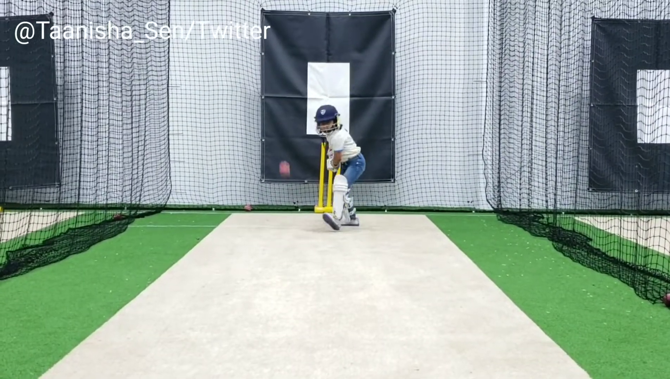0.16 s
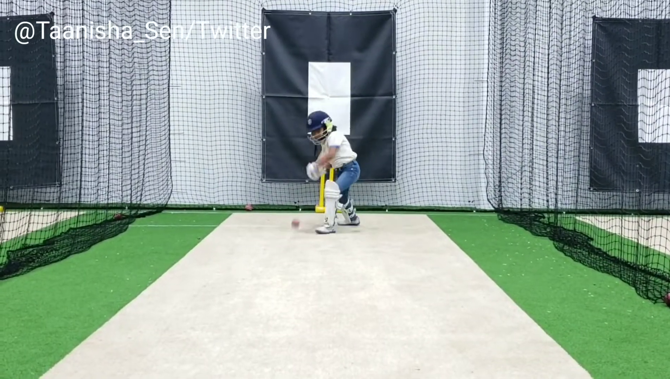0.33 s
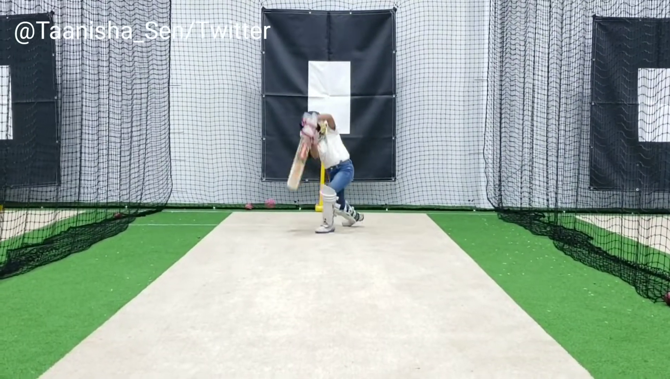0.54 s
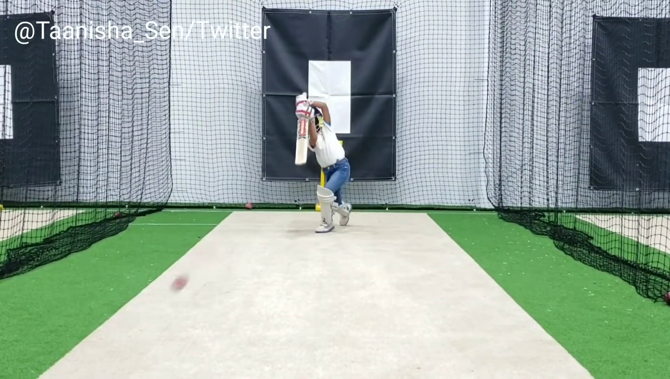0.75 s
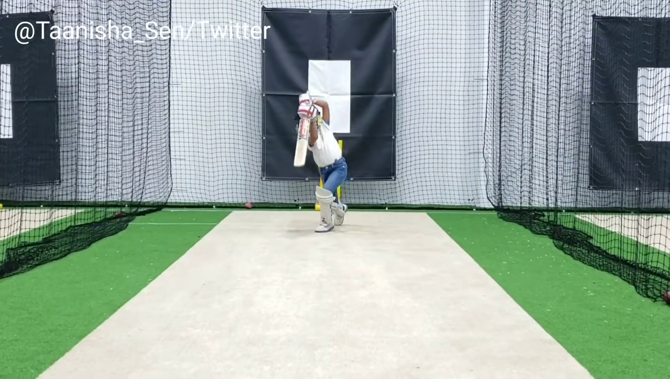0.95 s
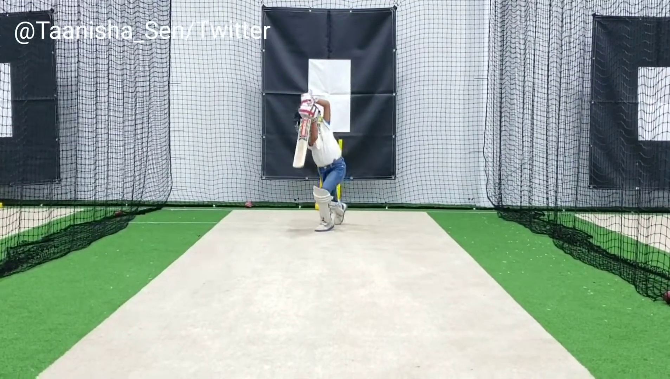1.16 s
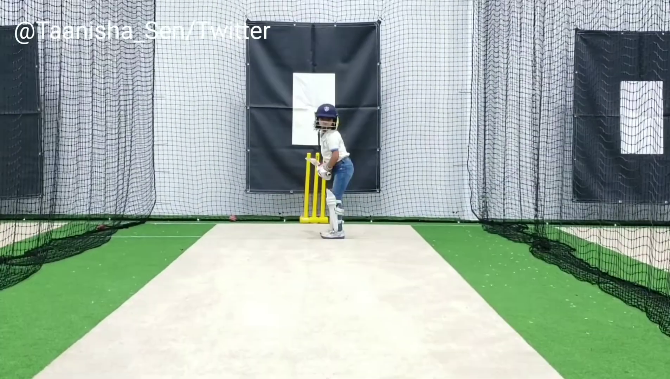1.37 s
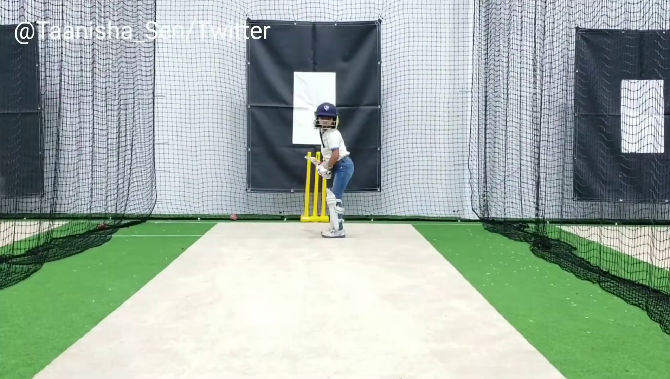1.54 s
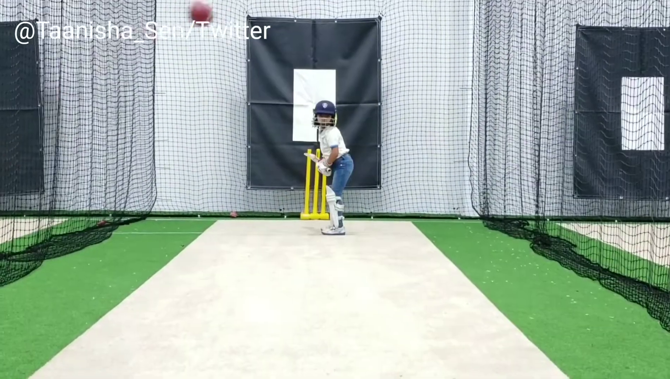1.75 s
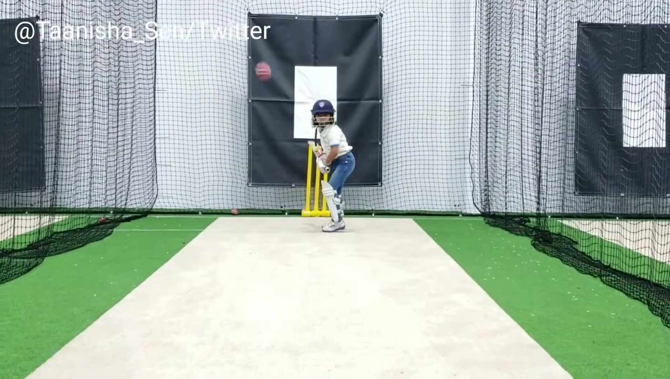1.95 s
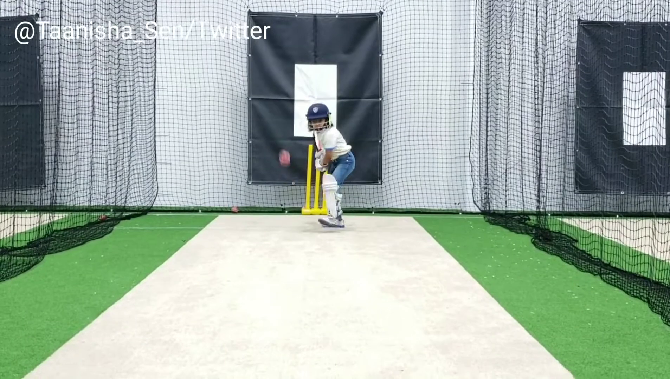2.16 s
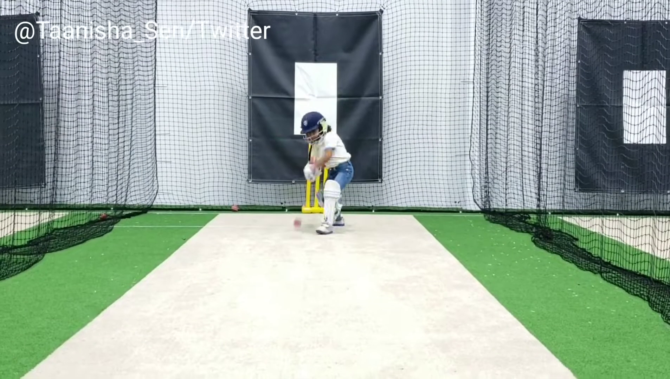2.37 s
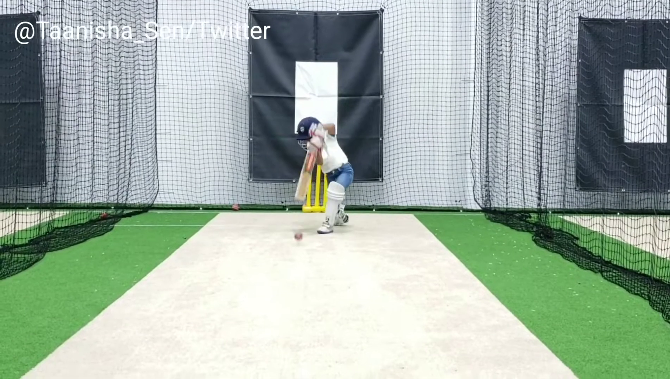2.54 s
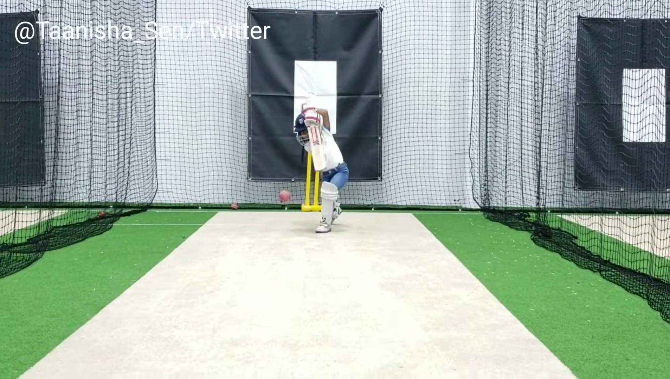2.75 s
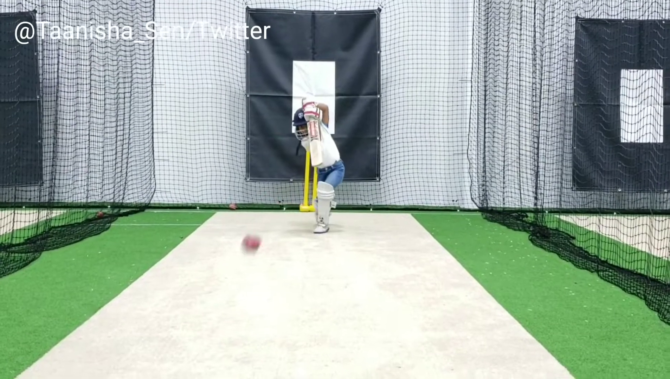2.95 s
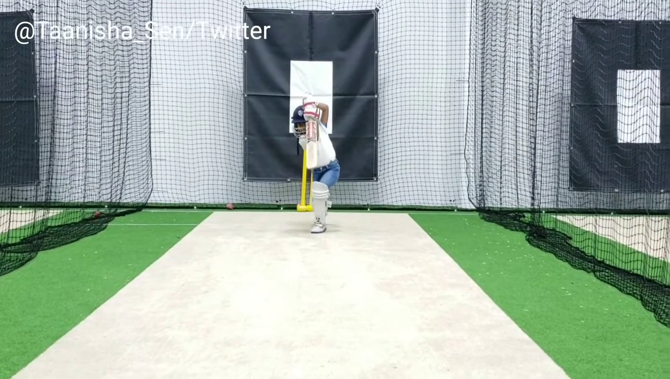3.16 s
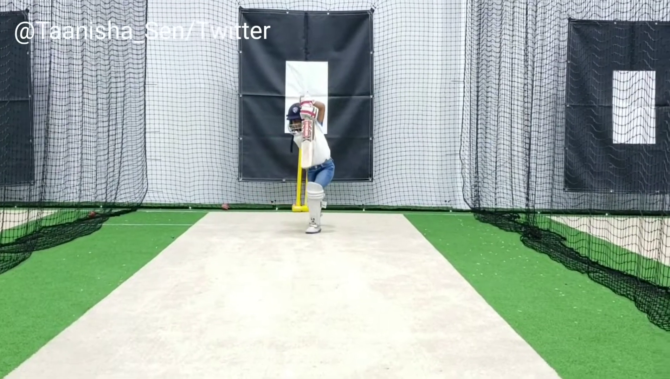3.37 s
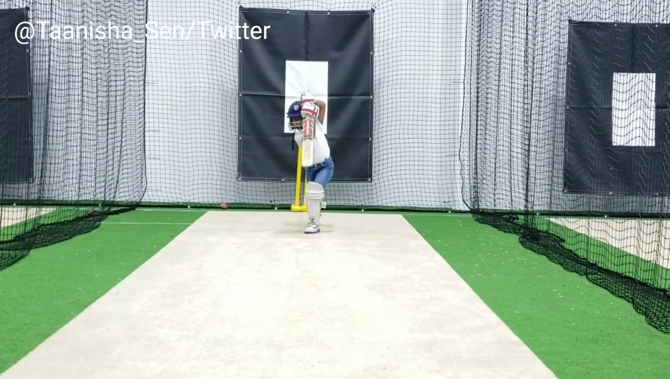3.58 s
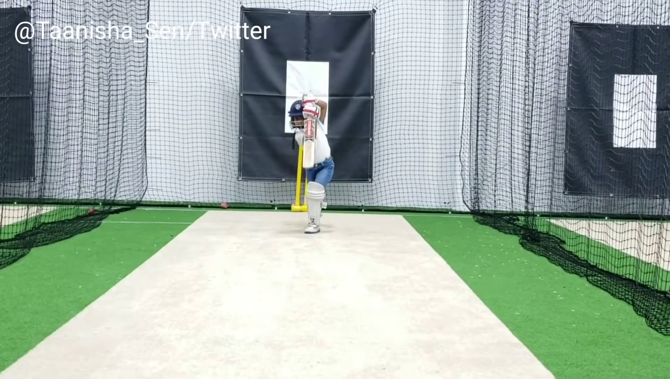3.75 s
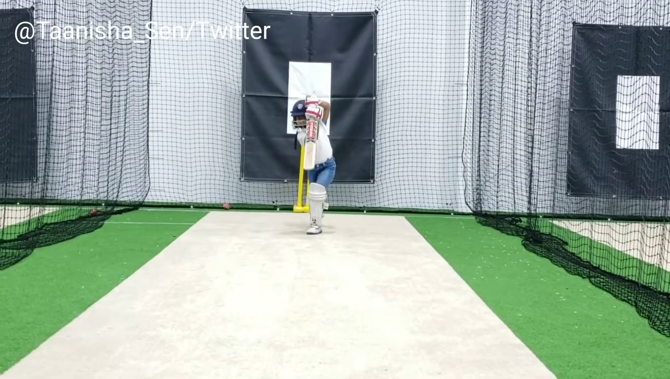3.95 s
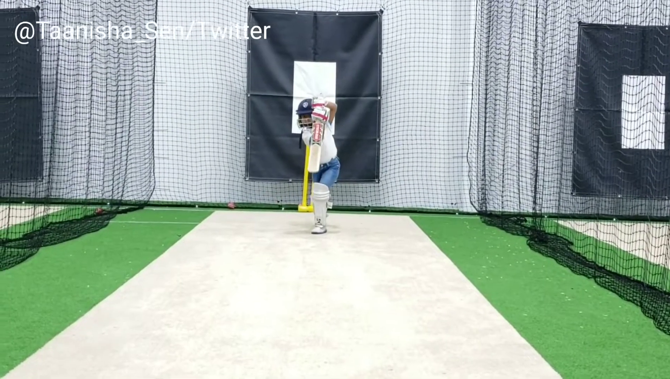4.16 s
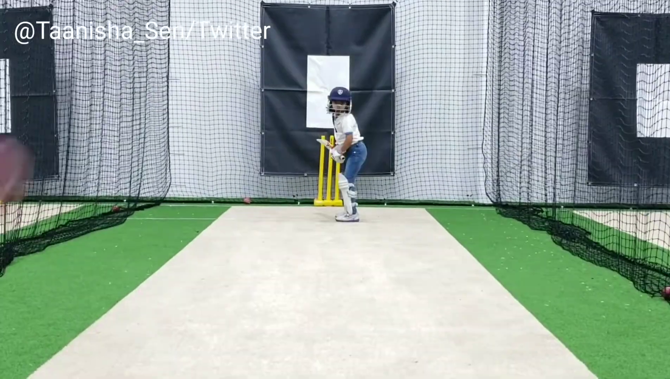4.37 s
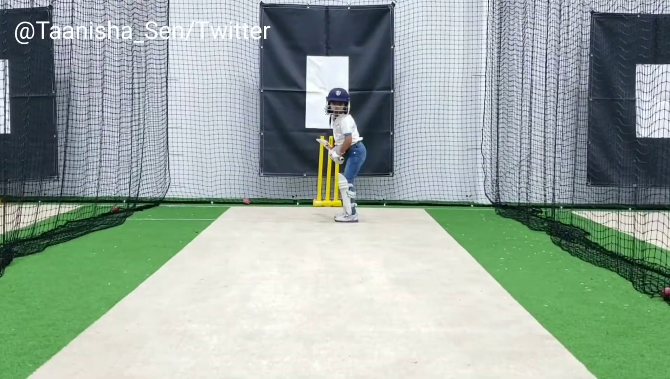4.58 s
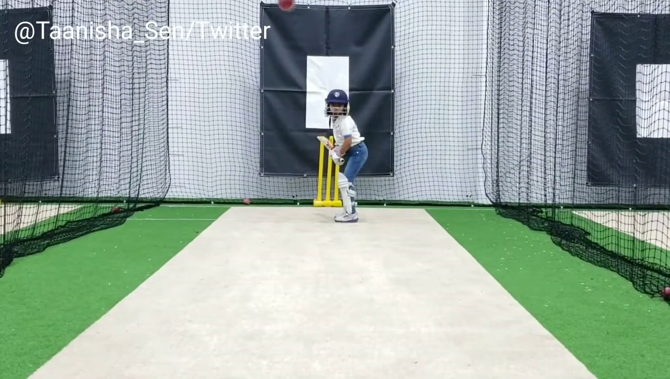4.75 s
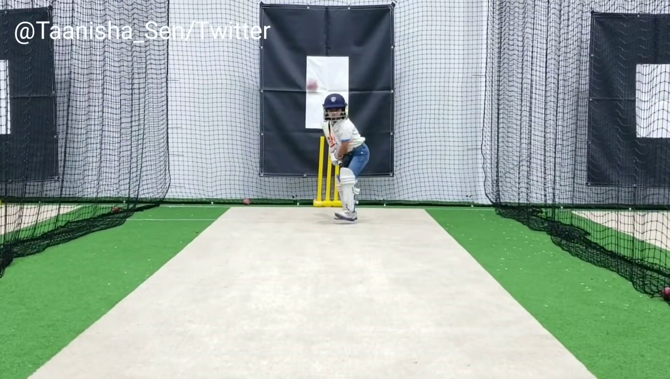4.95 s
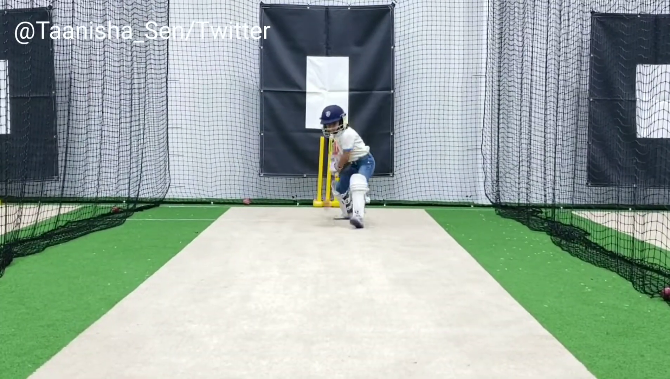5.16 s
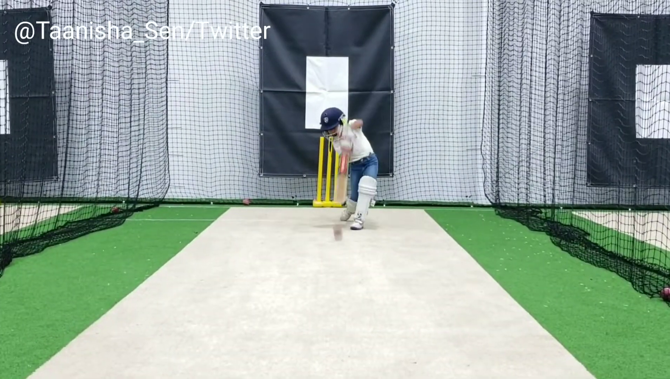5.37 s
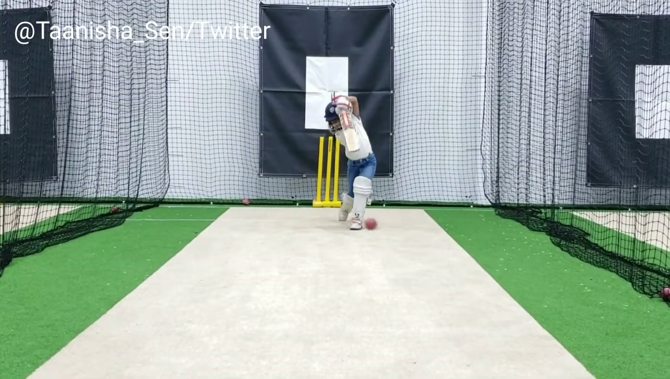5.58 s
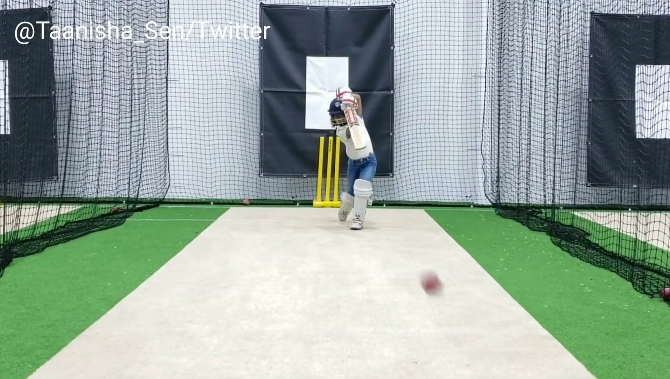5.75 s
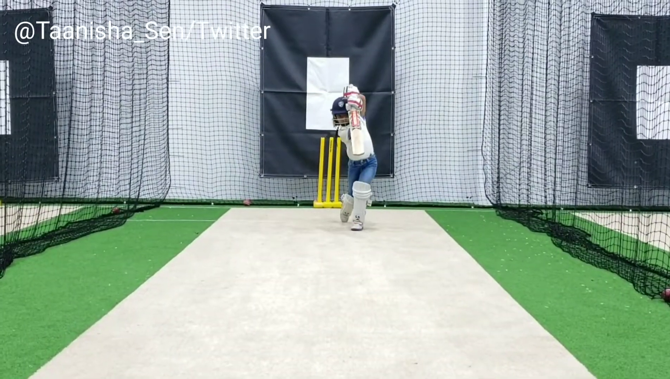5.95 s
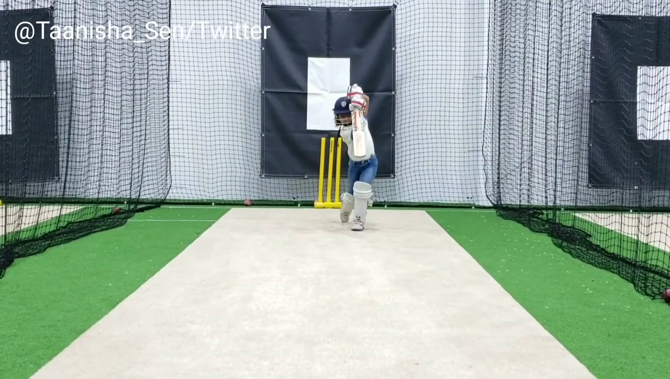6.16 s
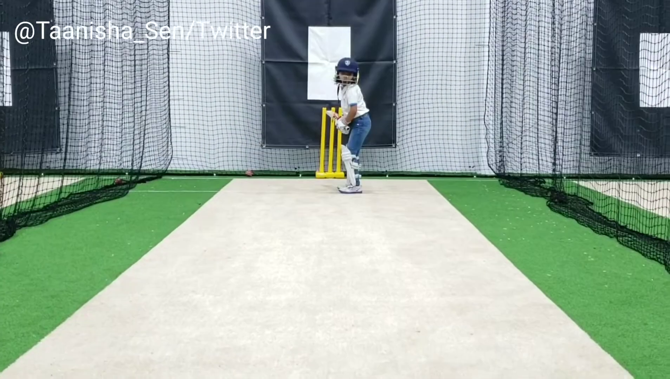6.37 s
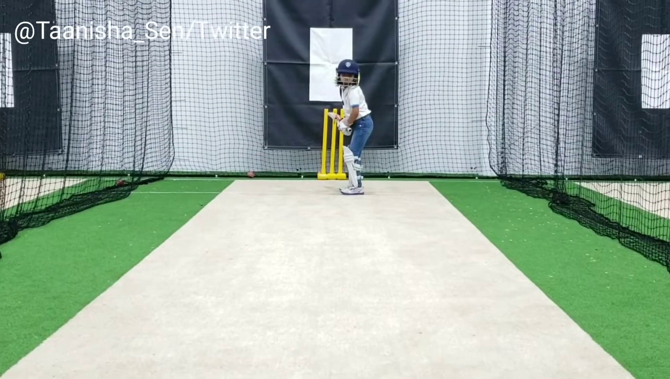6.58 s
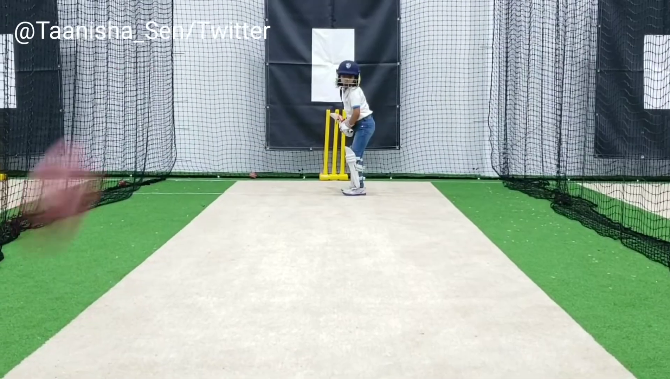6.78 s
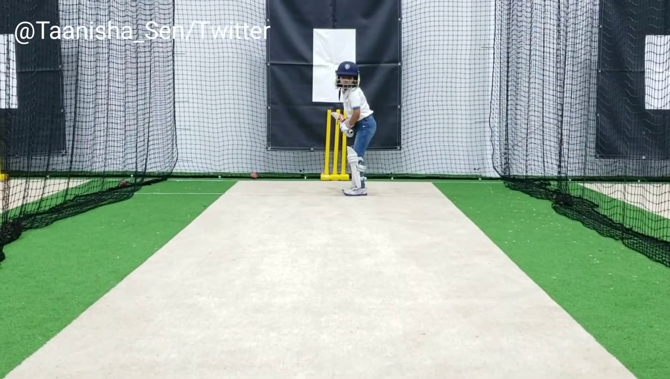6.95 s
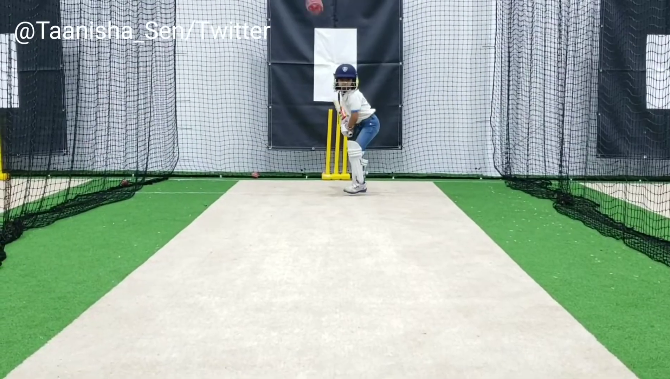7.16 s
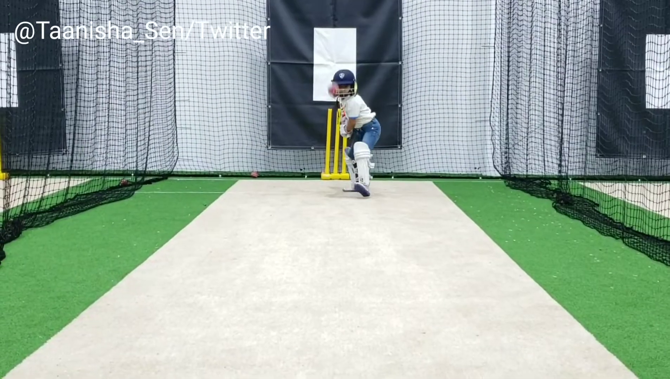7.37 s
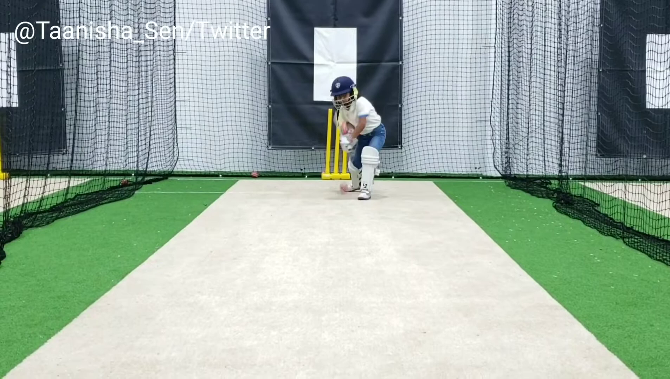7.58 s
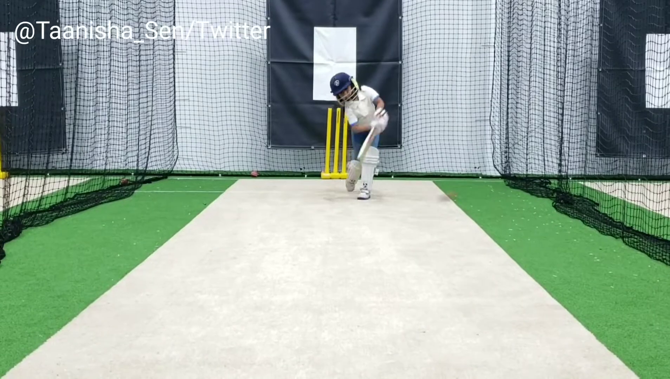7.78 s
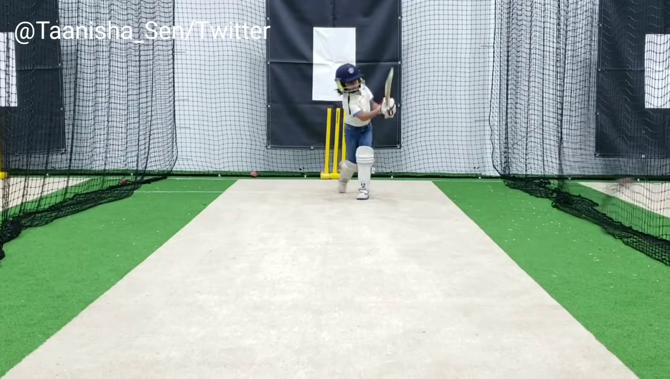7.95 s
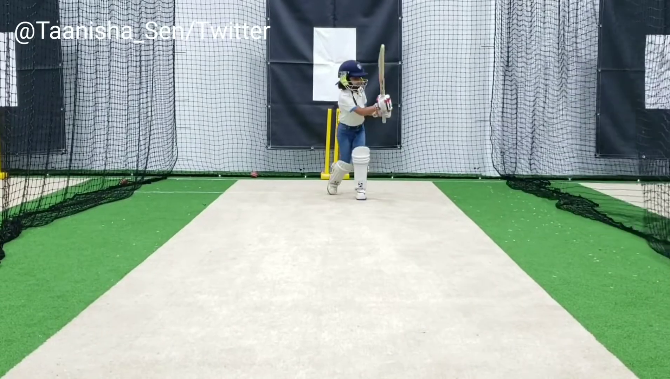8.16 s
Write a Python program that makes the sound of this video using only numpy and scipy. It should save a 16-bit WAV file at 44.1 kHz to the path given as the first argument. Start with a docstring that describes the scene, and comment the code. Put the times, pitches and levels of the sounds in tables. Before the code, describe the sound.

A quiet indoor cricket net hall, heard on a phone at the bowler's end, slightly louder on the left. Low rumble, faint hum and hiss open the scene. At 0.53 s a ball pitches with a dull thud; at 0.65 s a bat cracks it, very loud, short and woody, slapping off the back wall into a hall tail under a second. Small ticks and cloth rustle follow from 1.0 to 2.2 s. Another thud at 2.55 and a brighter crack at 2.67. Close knocks at 3.4 and 3.6, soft rustling, and a grainy scuff around 4.25-4.45. Thud at 5.4, darker crack at 5.49, then small bumps near 5.85-6.1 and 6.47 and cloth swishes until 7.2. A faint thud at 7.79 and a final, fuller, less bright knock at 7.86, ending with a light net rustle at 8.08. The background sinks after strokes and returns, except after the last.

```python
"""A willow bat cracks four times in an indoor net hall: damped wooden modes and a burst of noise,
slapped back by the wall behind the batter and followed by a diffuse hall tail of shaped noise.
Just before each stroke the ball pitches on the mat with a dull, damped thud.
Near the microphone are small knocks, clothes rustling as shaped noise and one grainy scuff; last, the net.
Background rumble and hiss of noise and a two-sine hum sink after each stroke and come back, bar the last."""
import sys
import numpy as np
from scipy import signal
from scipy.fft import rfft, irfft, next_fast_len
from scipy.io import wavfile
from scipy.ndimage import map_coordinates

SR = 44100
rng = np.random.default_rng(int(sys.argv[2]) if len(sys.argv) > 2 else 0)


def wav_out(sig):
    """Save sig, one row per channel (or a flat mono array), as 16-bit PCM at SR to the path in sys.argv[1]."""
    wavfile.write(sys.argv[1], SR, np.round(np.clip(np.atleast_2d(sig).T, -1, 1) * 32767).astype(np.int16))


N = 362502

# Noise of a hard contact. Each row: frequency in Hz, relative density in dB.
CONTACT_COLOUR = [(1500, -17.5), (3000, -6.5), (4000, -4.5), (5000, -9), (7000, -1.5), (10500, 2.5),
                  (12500, -9.5)]
# The blow as it spreads through the hall. Each row: frequency in Hz, relative density in dB per Hz.
HALL_COLOUR = [(50, -35.5), (100, -10), (160, -1.5), (250, 1.5), (320, 1), (450, -1), (700, -0.5),
               (1150, 2), (1600, -6.5), (2400, -11.5), (4000, -15), (7000, -15.5), (10500, -16),
               (13000, -38.5)]


def amp(db):
    """Decibels to gain."""
    return 10 ** (np.asarray(db) / 20)


def unit(x):
    """Scale to rms 1."""
    return x / np.sqrt(np.mean(x ** 2) + 1e-20)


def along(points, hz):
    """Read (Hz, value) points on a log frequency axis."""
    f, v = np.transpose(points)
    return np.interp(np.log(hz + 1), np.log(f + 1), v)


def bell(hz, centre, width):
    """A resonance curve, 1 at its centre and one half at the edges of its width."""
    return 1 / (1 + (2 * (hz - centre) / width) ** 2)


def pan(db):
    """Left and right gains, db apart."""
    return amp([[db / 2], [-db / 2]])


def wobble(rate, size=N):
    """A smooth random curve, rate knots a second."""
    knots = rng.standard_normal(int(size * rate / SR) + 4)
    return map_coordinates(knots, [np.arange(size) * rate / SR])


def fade(t60):
    """One second of exponential decay, falling 60 dB in t60 seconds."""
    return np.exp(-np.log(1000) * np.arange(SR) / SR / t60)


def envelope(start, end, attack_s, release_s, easing_db=0):
    """A straight attack, a hold that eases off by easing_db a second, and an exponential release."""
    t = np.arange(N) / SR
    attack = np.clip((t - start) / attack_s, 0, 1)
    held = amp(-easing_db * (np.clip(t, start, end) - start))
    return attack * held * np.exp(-np.maximum(t - end, 0) / release_s)


def filtered(x, response):
    """Filter x by a gain given as a function of frequency."""
    n = x.shape[-1]
    m = next_fast_len(n + SR // 4)
    return irfft(rfft(x, m) * response(np.fft.rfftfreq(m, 1 / SR)), m)[..., :n]


def noise(colour, size=N):
    """Diffuse stereo noise of rms 1: alike in the bass, unrelated in the treble."""
    # Each row: frequency in Hz, left-right correlation.
    alike = [(130, .94), (270, 0.82), (590, 0.64), (1250, 0), (2700, 0), (6000, 0)]

    def mid_side_gain(hz):
        turn = np.arccos(np.clip(along(alike, hz), -1, 1)) / 2
        return amp(along(colour, hz)) * [np.cos(turn), np.sin(turn)]

    mid, side = filtered(rng.standard_normal((2, size)), mid_side_gain)
    return unit(np.array([mid + side, mid - side]))


def add(track, s, sound):
    """Mix a sound into the track at time s."""
    start = max(round(s * SR), 0)
    part = track[:, start:start + sound.shape[-1]]
    part += sound[..., :part.shape[-1]]


def ring(modes, contact_s=.0005, upper_db=0, radiate_hz=100):
    """A struck body's damped modes build up during the contact; so small a body radiates no deep bass."""
    t = np.arange(SR) / SR
    swing = np.zeros(SR)
    for hz, db, t60 in modes:
        level = amp(db + upper_db * (hz > 1250))
        swing -= level * fade(t60) * np.sin(2 * np.pi * hz * t)
    high_pass = signal.butter(2, radiate_hz, "high", fs=SR, output="sos")
    return signal.sosfilt(high_pass, swing * (1 - np.exp(-t / contact_s)))


def hall(treble_db=0, presence_db=0, body_db=0, gap=0.0099, build_s=0.0034,
         early_db=6, early_t60=0.14, clump_db=1.5):
    """The hall's answer to one blow: dense early reflections, then a tail whose bands decay apart."""
    # Tail decay. Each row: frequency in Hz, t60 in seconds.
    decay = [(100, 0.96), (250, 1), (600, 0.89), (1100, 0.66), (1800, 0.93), (2600, 0.73), (5000, 0.88),
             (7000, 0.76), (9000, 0.52), (12000, 0.5)]
    # Pitches that stand out in the hall. Each row: frequency in Hz, width in Hz, lift in dB.
    peaks = [(148, 52, 1.5), (210, 26, 6), (284, 14, 3.5), (354, 36, 3.5), (666, 45, 4.5), (1030, 24, 7.5),
             (1377.6, 100, 3), (1940, 21, -2.5), (2350, 25, 0), (4820, 240, 2.5)]
    comb_s, comb_db = .0141, 1
    t = np.arange(SR) / SR

    def room_gain(f):
        peaks_db = sum(db * bell(f, centre, width) for centre, width, db in peaks)
        # a blow and its slap off the wall colour the hall like a comb
        return amp(peaks_db + comb_db * np.cos(2 * np.pi * f * comb_s))

    diffuse = filtered(noise(HALL_COLOUR, size=SR), room_gain)
    hz, s, z = signal.stft(unit(diffuse), SR, nperseg=512)
    decay_db = -60 * s / along(decay, hz)[:, None]
    # each blow lands on another spot and has its own uneven treble
    colour_db = 3 * rng.standard_normal(len(hz)) * hz / (hz + 1500)
    colour_db += body_db * bell(hz, 950, 600) + presence_db * bell(hz, 2700, 2200)
    colour_db += treble_db * hz ** 4 / (hz ** 4 + 7000 ** 4)
    tail = signal.istft(z * amp(decay_db + colour_db[:, None]), SR, nperseg=512)[1][:, :SR]
    early = 1 + amp(early_db) * fade(early_t60)
    clumps = amp(clump_db * wobble(110, size=SR))  # reflections arrive in clumps
    return tail * early * clumps * np.clip((t - gap) / build_s, 0, 1)


def background():
    """Low rumble, hum and hiss sink after each stroke and come back, bar the last, over steady quieter noise."""
    # Each row: start, end and attack in seconds, rumble in dB, hum in Hz, hum in dB, its octave in dB,
    # hum easing in dB per second (negative grows).
    spans = [(-0.1, .62, .05, -50.5, 70.9, -39, -51, 17), (1.37, 2.62, 0.029, -50.5, 94.7, -64, -72, -13),
             (3.762, 5.45, 0.26, -50.5, 79.4, -53, -53, -3.5),
             (6.344, 7.86, .12, -48, 73.7, -52.5, -55, -2.5)]
    # Low rumble. Each row: frequency in Hz, relative density in dB per Hz.
    rumble_colour = [(20, -23.5), (43, -9.5), (71, 1), (125, -1), (160, -3.5), (210, -6.5), (260, -11),
                     (370, -24.5), (470, -28), (560, -44), (800, -34), (1400, -56.5)]
    # Faint hiss. Each row: frequency in Hz, relative density in dB per Hz.
    hiss_colour = [(500, -1.5), (900, 0), (1500, -1.5), (4000, -3), (5500, -4.5), (6500, 7), (7400, -1.5),
                   (10500, -2.5), (12500, -15.5)]
    # The background at its quietest. Each row: frequency in Hz, relative density in dB per Hz.
    quiet_colour = [(30, -22.5), (70, -5.5), (110, 0.5), (210, 0.5), (300, -8), (450, -21.5), (700, -29),
                    (1400, -44), (4000, -69.5)]
    release_s, rumble_growth_db_per_s = 0.43, 1.5
    quiet_db, span_hiss_db, steady_hiss_db = -57, -76, -79.5

    rumble_power, hiss_power, hum = 0, amp(steady_hiss_db) ** 2, 0
    drift_hz = .7 * wobble(7)
    first_waver, octave_waver = amp(2.2 * wobble(17)), amp(1.8 * wobble(6))
    for start, end, attack, rumble_db, hz, first_db, octave_db, easing in spans:
        growing = envelope(start, end, attack, release_s, -rumble_growth_db_per_s)
        rumble_power += (amp(rumble_db) * growing) ** 2
        hiss_power += (amp(span_hiss_db) * envelope(start, end, attack, release_s)) ** 2
        phase = 2 * np.pi * np.cumsum(hz + drift_hz) / SR
        first = amp(first_db) * first_waver * np.sin(phase)
        octave = amp(octave_db) * octave_waver * np.sin(2 * phase)
        hum += envelope(start, end, attack, release_s, easing) * (first + octave)
    rumble = np.sqrt(rumble_power) * amp(1.2 * wobble(7.3)) * noise(rumble_colour)
    hiss = np.sqrt(hiss_power) * noise(hiss_colour)
    return rumble + hum + hiss + amp(quiet_db) * noise(quiet_colour)


def rustle():
    """Cloth slides and flicks in soft swishes, and the bat scrapes once; one scuff catches and slips in quick
    grains."""
    # Quick flicks; the one at 2.585 s is the bat scraping. Each row: peak in seconds, relative swish in dB,
    # relative fizz in dB, time constant of rise and fall in seconds.
    flicks = [(1.435, -65.5, -57, 0.01), (1.69, -65, -58, .033), (2.068, -50, -53, 0.023),
              (2.585, -74, -62.5, .018), (3.21, -66, -65, .019), (3.5, -72, -71, .03),
              (4.09, -64, -62, .05), (4.77, -62, -69, .018), (5.02, -79.5, -77.5, .1),
              (6.11, -67, -65, .02), (6.18, -66, -86, .03), (6.89, -65.5, -63, .06),
              (7.195, -60.5, -69, .021)]
    # Longer slides. Each row: start and end in seconds, relative swish in dB, relative fizz in dB,
    # easing in dB per second (negative grows).
    slides = [(1.416, 2.16, -75, -65.5, 17.5), (3.2, 3.374, -80, -78, 0), (3.384, 3.506, -74.5, -69.5, 9),
              (3.615, 4.538, -76, -71.5, -1.5), (6.193, 6.56, -83, -81, 0), (6.552, 7.15, -71.5, -67, 18.5)]
    # The scuff catches, then drags. Each row: start, end and attack in seconds, level in dB,
    # left over right in dB.
    scuffs = [(4.228, 4.242, 0.0022, -48.5, 5), (4.245, 4.393, 0.042, -46.5, 1.5),
              (4.39, 4.455, 0.034, -51, 1)]
    # Body of the cloth noise. Each row: frequency in Hz, relative density in dB per Hz.
    swish_colour = [(500, -0.5), (1200, 0.5), (3000, 2), (5000, 4), (7500, -5), (11000, -46)]
    # Its treble. Each row: frequency in Hz, relative density in dB per Hz.
    fizz_colour = [(3000, -34.5), (5500, -2), (8000, 3.5), (10500, 1.5), (12500, -25.5)]
    # Scuff noise. Each row: frequency in Hz, relative density in dB per Hz.
    scuff_colour = [(1000, -25), (1900, -21.5), (2600, -3), (3500, -0.5), (4700, 6), (6500, -2.5),
                    (10500, -6), (12500, -26.5)]
    slide_attack_s, slide_release_s, scuff_release_s = 0.019, 0.13, 0.018

    t = np.arange(N) / SR
    moves = []
    for s, swish_db, fizz_db, width in flicks:
        moves.append((np.exp(-np.abs(t - s) / width), swish_db, fizz_db))
    for start, end, swish_db, fizz_db, easing in slides:
        shape = envelope(start, end, slide_attack_s, slide_release_s, easing)
        moves.append((shape, swish_db, fizz_db))
    swish = np.sqrt(sum((shape * amp(db)) ** 2 for shape, db, _ in moves))
    fizz = np.sqrt(sum((shape * amp(db)) ** 2 for shape, _, db in moves))
    cloth = amp(2.0) * swish * noise(swish_colour) + amp(2.5) * fizz * noise(fizz_colour)
    cloth = cloth * amp(0.55 * wobble(120))

    drag = np.zeros((2, N))
    for start, end, attack, db, left_db in scuffs:
        drag += amp(db) * pan(left_db) * envelope(start, end, attack, scuff_release_s)
    grains = amp(2.5 * wobble(260))
    return cloth + drag * grains * noise(scuff_colour)


def knocks():
    """Small knocks, mostly close and nearly dry: damped thump, noise tick; the last is the ball in the net."""
    # Each row: time in seconds, thump in dB, tick in dB, tick t60 in seconds, relative hall in dB,
    # tick left over right in dB. The last row is the ball rustling in the net.
    contacts = [(0.989, -70, -50, 0.033, -53.5, 4), (1.182, -43.5, -82, 0.018, -75, 0),
                (1.329, -67, -46.5, 0.057, -67, 1), (1.359, -68, -56.5, 0.18, -82, 2),
                (2.149, -44, -51, 0.0077, -83.5, 6), (3.367, -31, -41.5, 0.027, -63.5, -0.5),
                (3.393, -42.5, -60, .02, -60.5, 3), (3.600, -34, -46, 0.068, -62, -1),
                (3.606, -27.5, -39.5, 0.019, -62, 2), (4.050, -48.5, -48.5, 0.13, -58.5, 9.5),
                (4.499, -67, -53, 0.046, -75, -1), (5.849, -38, -75, .02, -83, 5),
                (6.026, -41, -77, 0.018, -71, 0), (6.076, -35.5, -43, 0.049, -56.5, -1),
                (6.468, -50.5, -55, 0.024, -83, 2.5), (8.083, -57, -48, 0.066, -45, 0)]
    # Modes of the thump. Each row: frequency in Hz, relative level in dB, t60 in seconds.
    thump_modes = [(221, 5, 0.022), (368, 9, 0.0074), (743, 1, 0.014), (1130, -9, 0.018)]
    # Bright tick. Each row: frequency in Hz, relative density in dB per Hz.
    tick_colour = [(1000, -5), (2500, 1.5), (5000, 1), (7000, 7.5), (8200, 5), (10500, 2), (12500, -18)]
    out = np.zeros((2, N))
    for s, thump_db, tick_db, t60, hall_db, left_db in contacts:
        thump = amp(thump_db) * ring(thump_modes, contact_s=0.0015)
        tick = amp(tick_db) * pan(left_db) * fade(t60) * noise(tick_colour, size=SR)
        add(out, s, thump + tick)
        answer = hall(treble_db=9.0, presence_db=1.5, early_db=-33) * fade(1.0)
        add(out, s, amp(hall_db) * answer)
    return out


def bounces(wall_s=.018, wall_db=-9):
    """The ball lands on the soft mat with a dull thud just before each stroke; wall and hall answer."""
    # Each row: time in seconds, thud in dB, relative hall in dB.
    pitches = [(0.5277, -29, -45.5), (2.554, -34.5, -51), (5.4050, -29.5, -48), (7.7874, -35, -51)]
    # Modes of the mat. Each row: frequency in Hz, relative level in dB, t60 in seconds.
    mat_modes = [(233.6, 8.5, 0.023), (508, 17.5, 0.0077), (700, -5.5, 0.052), (1110, -10.5, 0.013),
                 (2340, -18, 0.012)]
    out = np.zeros((2, N))
    for s, db, hall_db in pitches:
        contact = amp(-33.5) * fade(.035) * noise(CONTACT_COLOUR, size=SR)
        thud = amp(db) * (ring(mat_modes, contact_s=0.0025) + contact)
        add(out, s, thud)
        add(out, s + wall_s, amp(wall_db) * thud)
        answer = hall(treble_db=-9.5, presence_db=-1.5, gap=0.007, build_s=0.011, early_db=-9.5)
        add(out, s, amp(hall_db) * answer)
    return out


def bat(crack_t60=0.0067, scatter_db=-27, scatter_t60=0.031, ring_hz=3120, ring_t60=0.94):
    """Each stroke: a dead wooden knock with a hard crack, the slap off the back wall, then the hall."""
    # Each row: time in seconds, then in dB: direct knock, lift of the upper modes, crack, relative wall slap,
    # relative hall, lift of the hall's body, of its presence and of its treble, thin ring.
    strokes = [(0.6472, 2, 5, -23.5, -11.5, -24, -1, 3.5, 3, -40),
               (2.6656, -4, -0.5, -19, -0.5, -26.5, 1.5, 3, 8, -59.5),
               (5.4920, 1, 0, -23.5, -6.5, -22, -0.5, 0.5, -7.5, -53),
               (7.8560, 3.5, -8.5, -17, -12.5, -21.5, -1.5, -5, -0.5, -70)]
    # Bat and ball, damped by the hands. Each row: frequency in Hz, relative level in dB, t60 in seconds.
    willow_modes = [(182, -13, 0.02), (328, -8, .021), (641, 1, .012), (960, -14, 0.0083), (1533, -9, .01),
                    (1967, -13, 0.009), (3850, -26.5, 0.0073), (4920, -27, .016), (5916, -26, 0.0058),
                    (7340, -23.5, 0.01)]
    # Surfaces behind the batter. Each row: delay in seconds, relative gain.
    walls = [(0.0137, .62), (0.0146, 0.68), (.0172, .25), (0.0203, 0.46)]
    out = np.zeros((2, N))
    for s, db, upper_db, crack_db, slap_db, hall_db, body_db, presence_db, treble_db, ring_db in strokes:
        knock = amp(db) * ring(willow_modes, contact_s=0.0011, upper_db=upper_db, radiate_hz=135)
        crack = amp(crack_db) * fade(crack_t60) * noise(CONTACT_COLOUR, size=SR) * pan(2)
        # the mat and the batter's pads scatter a little of the blow at once
        scatter = amp(db + scatter_db) * fade(scatter_t60) * noise(HALL_COLOUR, size=SR)
        blow = knock + crack + scatter
        add(out, s, blow)
        for delay, gain in walls:
            add(out, s + delay, gain * amp(slap_db + 4.5) * blow)
        add(out, s, amp(hall_db) * hall(treble_db, presence_db, body_db))
        # a thin, narrow ring hangs on after the blow
        thin = filtered(rng.standard_normal((2, SR)), lambda hz: bell(hz, ring_hz, 290))
        add(out, s + walls[0][0], amp(ring_db) * fade(ring_t60) * unit(thin))
    return out


def scene():
    """Everything in the hall reaches the left microphone a little louder."""
    # Each row: frequency in Hz, left over right in dB.
    leftward = [(60, 4), (400, 5), (1700, 6), (4000, 5), (11000, 4.5)]
    mix = bat() + bounces() + knocks() + rustle() + background()
    return filtered(mix, lambda hz: pan(along(leftward, hz))[:, 0] * amp(-0.26))


def record(dry):
    """The tallest peaks are rounded off softly, and the phone cuts steeply above its band limit."""
    ceiling, top_hz = .92, 11700
    held = dry / (1 + np.abs(dry / ceiling) ** 8) ** (1 / 8)
    return filtered(held, lambda hz: 1 / np.sqrt(1 + (hz / top_hz) ** 120))


dry = scene()
out = record(dry)
wav_out(out)
```